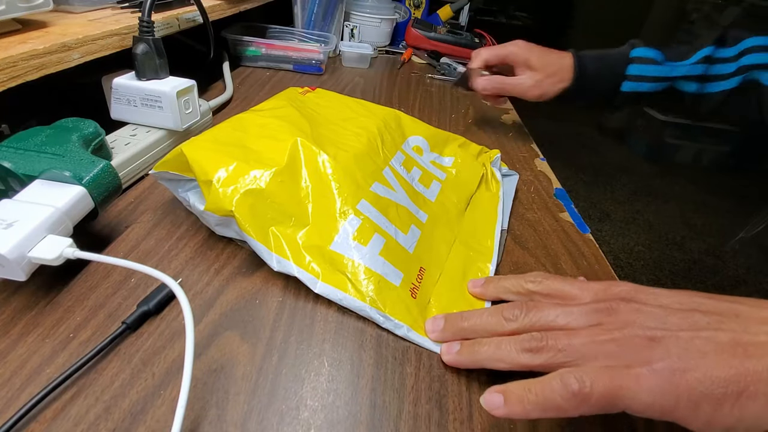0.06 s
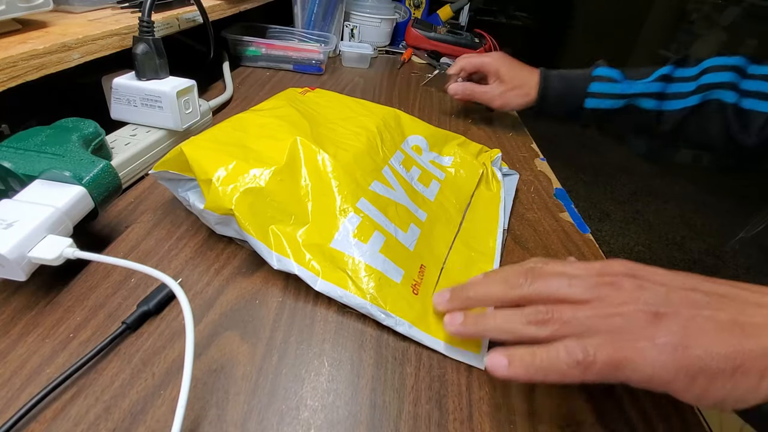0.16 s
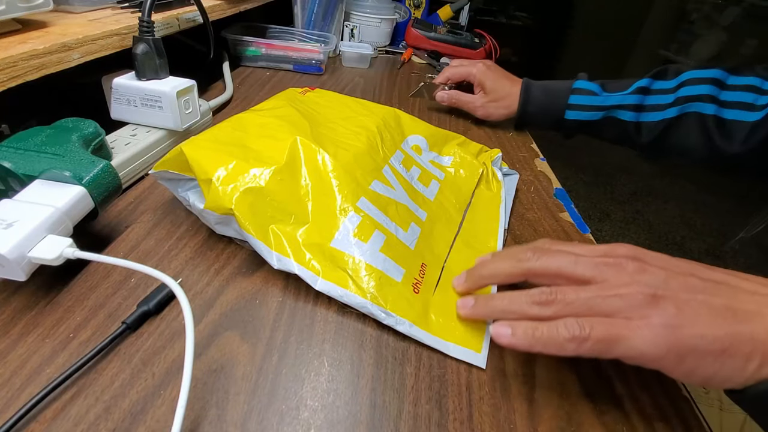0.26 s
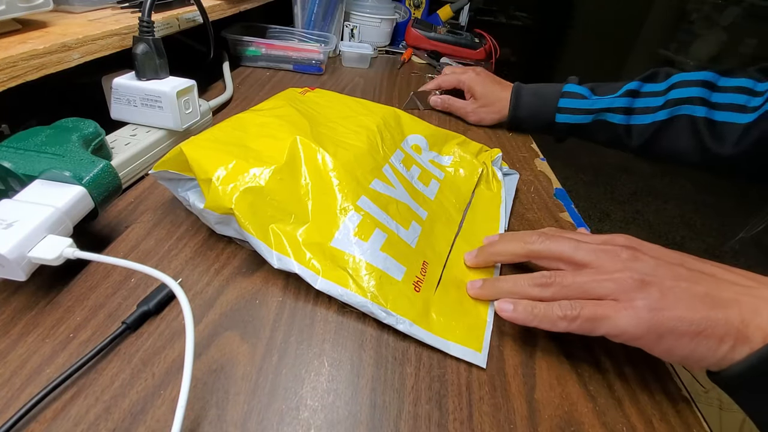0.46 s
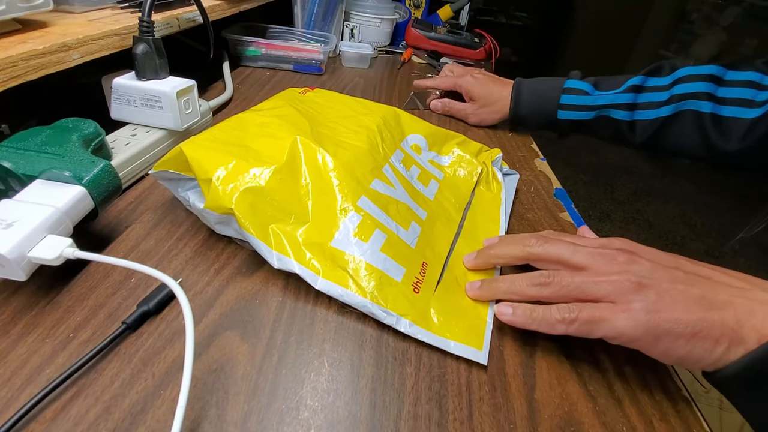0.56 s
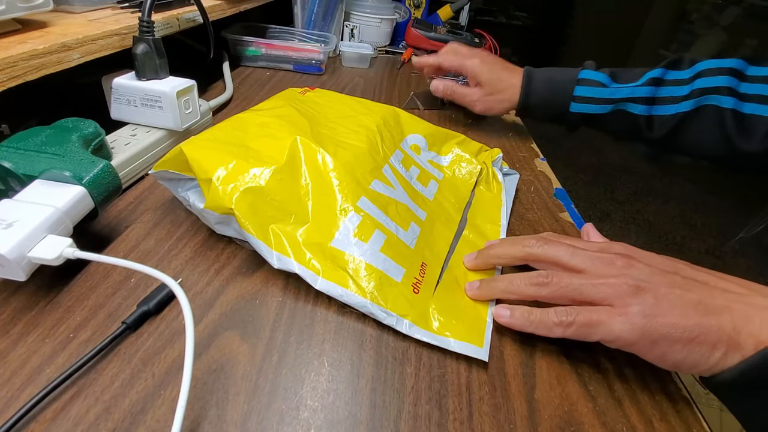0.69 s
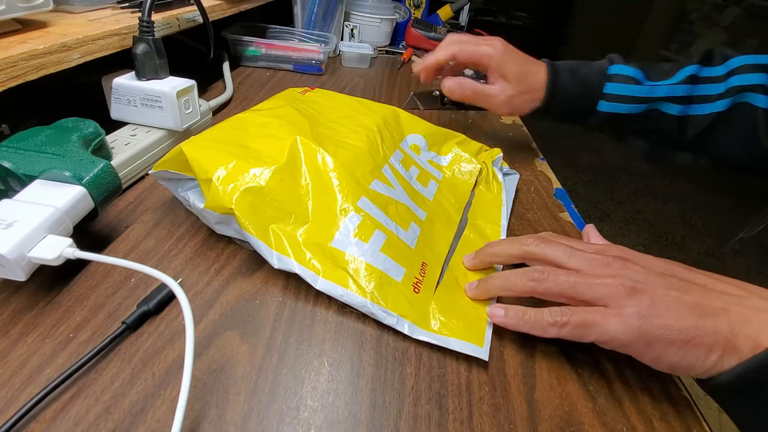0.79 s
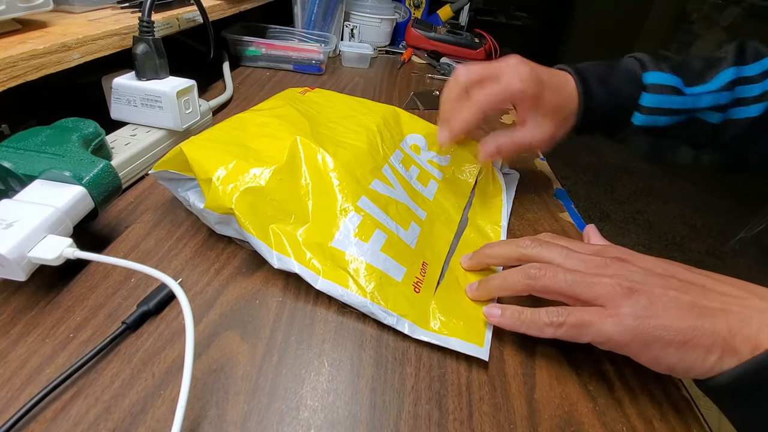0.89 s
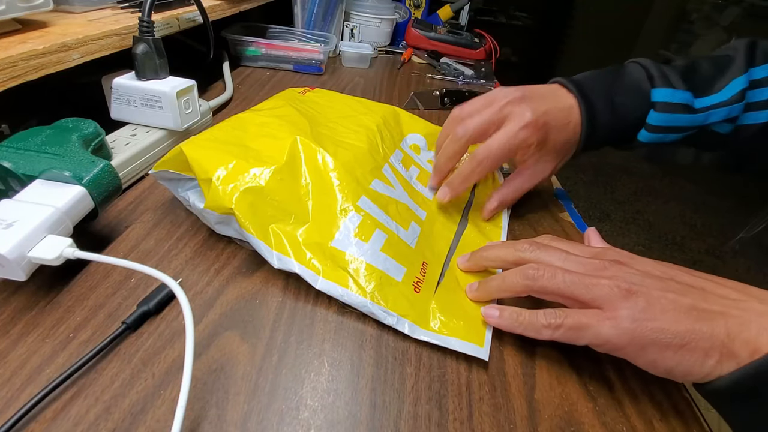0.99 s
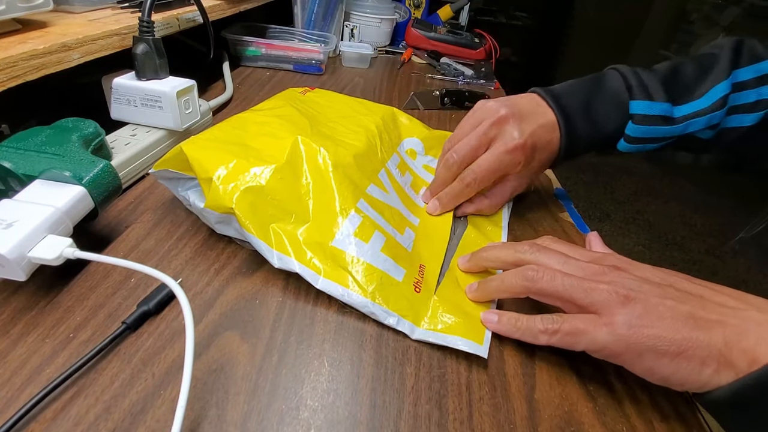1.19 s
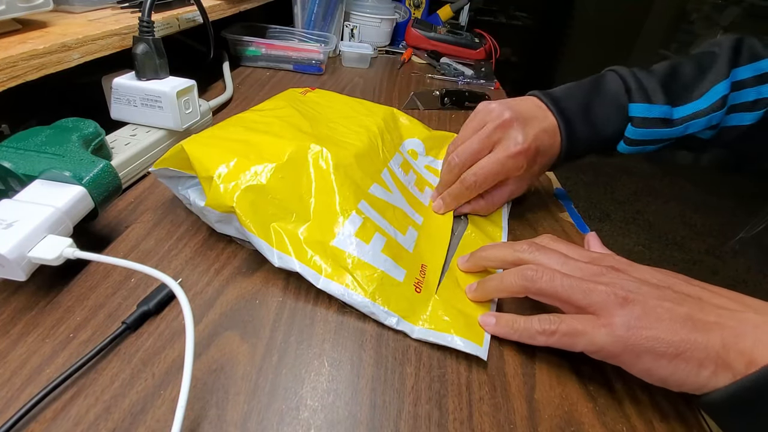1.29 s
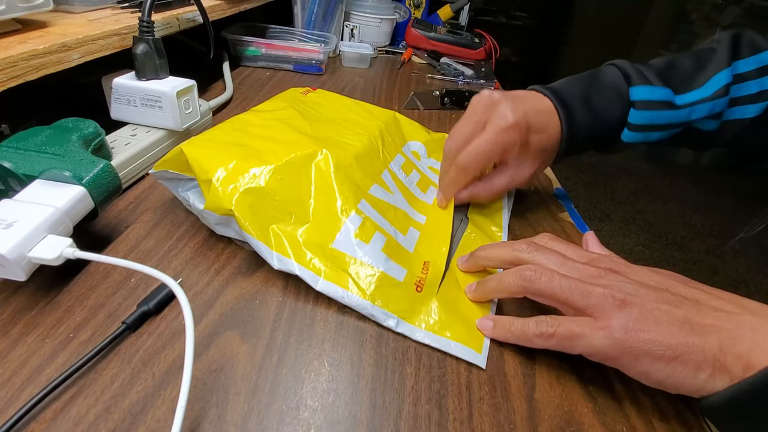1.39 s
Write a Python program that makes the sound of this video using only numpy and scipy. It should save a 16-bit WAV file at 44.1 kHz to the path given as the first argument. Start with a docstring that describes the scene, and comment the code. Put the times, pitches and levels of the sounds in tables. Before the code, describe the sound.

A small blade clunks twice onto a wooden workbench, rattles to rest, and a plastic mailer crackles

```python
"""A wooden workbench in a small room, with a plastic mailer on it, heard in stereo from close by, a little to the left.
A blade finishes its slit with a short rip and is put down: two knocks, made of contact pulses, ringing bench modes
and bursts of noise. Something light then rocks to rest in dull taps and short hollow notes. Fingers pull at the slit
and the film crinkles: snaps and crackles of resonant noise, which also makes one small metallic tool click.
Low brushing, rumble and room noise lie underneath."""
import sys
import numpy as np
from scipy import signal
from scipy.fft import irfft
from scipy.io import wavfile

SR = 44100
rng = np.random.default_rng(int(sys.argv[2]) if len(sys.argv) > 2 else 0)


def inscribe(sig):
    """Save sig as 16-bit PCM at rate SR to the path in sys.argv[1].

    A 1-D sig is mono; a 2-D sig holds one channel per row.
    Samples are clipped to [-1, 1] before scaling.
    """
    pcm = np.round(np.clip(np.atleast_2d(sig).T, -1, 1) * 32767)
    wavfile.write(sys.argv[1], SR, pcm.astype(np.int16))


N = 63945
T = np.arange(N) / SR


def from_db(db):
    """Decibels to gain."""
    return 10 ** (np.asarray(db) / 20)


def at_hz(points, hz):
    """Read a spectrum on a log-frequency axis."""
    f, v = np.transpose(points)
    return np.interp(np.log(hz + 1e-9), np.log(f), v)


def in_time(rows, s):
    """Read each column of a curve at the given times."""
    times, *columns = np.transpose(rows)
    return [np.interp(s, times, column) for column in columns]


def pan(left_db):
    """Gains of the two channels, the left one left_db above the right."""
    return from_db(np.array([[.5], [-.5]]) * left_db)


def fade(t, t60):
    """Exponential decay by 60 dB in t60 seconds."""
    return np.exp(-np.log(1000) * t / t60)


def add(out, s, sound):
    """Mix a sound in at a given time."""
    i = max(int(s * SR), 0)
    part = out[:, i:i + sound.shape[-1]]
    part += sound[..., :part.shape[-1]]


# Likeness of the two microphone channels. Each row: frequency in Hz, likeness from 0 (unrelated) to 1 (same).
CHANNEL_LIKENESS = [(60, .95), (300, .85), (700, 0.52), (1400, 0.22), (3000, .25), (7000, 0), (15000, 0)]


def noise(spectrum, size, extra_db=lambda hz: 0):
    """Stereo noise of random phases with a given spectrum, more alike in the bass; rms 1."""
    hz = np.fft.rfftfreq(size, 1 / SR)
    mid, side = np.exp(2j * np.pi * rng.random((2, len(hz))))
    alike = np.clip(at_hz(CHANNEL_LIKENESS, hz), -1, 1)
    both = np.sqrt(1 + alike) * mid + np.sqrt(1 - alike) * side * [[1], [-1]]
    gain = from_db(at_hz(spectrum, hz) + extra_db(hz))
    x = irfft(both * gain * (hz > 0), size)
    return x / np.sqrt(np.mean(x ** 2))


ROOM_T60_S, ROOM_DELAY_S = 0.25, 0.0036
EARLY_T60_S, EARLY_DB = 0.054, 17  # level relative to the room's tail


def room(x):
    """Quick reflections from the bench and shelves, then the room's short tail, as fading noise."""
    t = T[:SR // 3]
    decay = fade(t, ROOM_T60_S) + from_db(EARLY_DB) * fade(t, EARLY_T60_S)
    echo = rng.standard_normal((2, len(t))) * decay * (t > ROOM_DELAY_S)
    echo = echo / np.sqrt(np.sum(echo ** 2) / 2)
    return signal.fftconvolve(x, echo, axes=1)[:, :N]


# The hand and the bag brushing the bench. Each row: time in seconds, level in dB before panning.
BRUSH_LEVEL = [(0, -48), (.05, -58), (.11, -72), (.16, -94), (.36, -63), (.46, -51), (.545, -52.5),
               (.58, -95), (1.02, -60), (1.07, -57), (1.13, -60), (1.27, -83), (1.45, -70)]
# Colour of the brushing. Each row: frequency in Hz, relative level in dB.
BRUSH_SPECTRUM = [(25, -22.5), (55, 3), (95, 6), (160, -13.5), (350, -2.5), (800, -25.5), (2000, -43.5)]
# Faint low rumble of the shaken bench. Each row: time in seconds, level in dB before panning.
SHIVER_LEVEL = [(.2, -82), (.24, -66.5), (.55, -60), (.9, -65.5), (1.45, -60)]
# Colour of that rumble. Each row: frequency in Hz, relative level in dB.
SHIVER_SPECTRUM = [(30, -19.5), (60, 1.5), (150, -5.5), (240, -1.5), (350, -1.5), (500, -5), (800, -14),
                   (2000, -43)]
# Colour of the quiet room. Each row: frequency in Hz, relative level in dB.
QUIET_SPECTRUM = [(20, -17), (50, 8), (100, -6), (170, -14.5), (300, -26), (700, -20), (2000, -28.5),
                  (7000, -25.5), (7600, -36.5), (16000, -34.5)]
QUIET_DB = -70


def background():
    """Soft low brushing and the shaken bench, as noise with moving levels over the steady quiet of the room."""
    brush = from_db(in_time(BRUSH_LEVEL, T)[0]) * noise(BRUSH_SPECTRUM, size=N)
    shiver = from_db(in_time(SHIVER_LEVEL, T)[0]) * noise(SHIVER_SPECTRUM, size=N)
    quiet = from_db(QUIET_DB) * noise(QUIET_SPECTRUM, size=N)
    return (brush + shiver + quiet) * pan(2.5)


# Knocks on the bench, the first with a faint second contact. Each row: time in seconds, spot struck,
# contact pulse in dB, its pitch in Hz, then modes, dense ring, room tail and clatter in dB, all before panning.
KNOCKS = [(.2220, "first", -4, 1204, -27.5, -17, -22, -31.5),
          (.2640, "first", -43, 600, -41.5, -35, -42.5, -70),
          (0.4321, "second", -8, 1171, -30.5, -13.5, -23.5, -33.5)]
# The bench's modes. Each row: frequency in Hz, t60 in seconds,
# relative level in dB when struck at the first spot, the same at the second spot.
BENCH_MODES = [(58.9, 0.45, -19, -9.5), (88, 0.31, -3, -5), (117.6, 0.13, -6, 3.5), (211, 0.11, -13.5, -2),
               (268.2, 0.28, -6.5, -15), (390, 0.14, 2.5, 8), (471.4, 0.23, -2.5, -11),
               (645.2, 0.17, 2.5, -0.5), (707.6, .13, 0, 5), (851.5, 0.2, 0.5, -0.5), (979, 0.084, 6, -20),
               (1065, 0.11, 2, 7.5), (1155, 0.1, 6.5, 8), (1492, 0.057, 11, -7), (1860, 0.075, -19, -23.5),
               (2428, 0.08, -30, -10.5)]
# Colours of the dense ring, room tail and clatter. Each row: frequency in Hz, relative level in dB.
RING_SPECTRUM = [(20, -41), (45, -20), (100, 4), (300, -6.5), (700, 2.5), (1500, 3.5), (1900, 0.5),
                 (2700, -20.5), (4500, -22), (8000, -39), (16000, -40)]
TAIL_SPECTRUM = [(20, -35), (45, -11.5), (100, 2), (300, 4), (700, -1), (1400, 0), (2000, -11),
                 (2800, -17.5), (6300, -25), (8000, -32.5), (16000, -34.5)]
CLATTER_SPECTRUM = [(500, -24), (2500, 0), (5500, -0.5), (8000, -11.5), (12000, -7), (16000, -21.5)]
RING_T60_S = 0.074
TAIL_T60_S, TAIL_RISE_S = .23, 0.012
CLATTER_T60_S, CLATTER_DELAY_S = 0.059, .002
KNOCK_LEFT_DB, PULSE_LEFT_DB, RIGHT_LAG_S = 2.5, 7.5, .00003


def contact_pulse(s, hz):
    """A hard contact: one dip between two smaller humps, reaching the right channel slightly late."""
    arrival = s + np.array([[0], [RIGHT_LAG_S]])
    u = (np.pi * hz * (T - arrival)) ** 2
    return (2 * u - 1) * np.exp(-u)


def bench_modes(spot, t):
    """The bench rings as fading sines of alternating sign, balanced by the spot that is struck."""
    total = 0
    for k, (hz, t60, first_db, second_db) in enumerate(BENCH_MODES):
        db = first_db if spot == "first" else second_db
        total = total + (-1) ** k * from_db(db) * np.sin(2 * np.pi * hz * t) * fade(t, t60)
    return total


def knocks():
    """A hard contact pulse sets the bench ringing; loose things on it clatter and the room answers."""
    out, t = np.zeros((2, N)), T[:SR // 2]
    pulses = 0
    for s, spot, pulse_db, hz, modes_db, ring_db, tail_db, clatter_db in KNOCKS:
        pulses = pulses + from_db(pulse_db) * contact_pulse(s, hz)
        modes = from_db(modes_db) * bench_modes(spot, t)
        ring_onset = np.minimum(t * hz, 1)
        ring = from_db(ring_db) * noise(RING_SPECTRUM, size=len(t)) * fade(t, RING_T60_S) * ring_onset
        tail_shape = fade(t, TAIL_T60_S) * (1 - np.exp(-t / TAIL_RISE_S))
        tail = from_db(tail_db) * noise(TAIL_SPECTRUM, size=len(t)) * tail_shape
        clatter = from_db(clatter_db) * noise(CLATTER_SPECTRUM, size=len(t)) * fade(t, CLATTER_T60_S)
        add(out, s, modes + ring + tail)
        add(out, s + CLATTER_DELAY_S, clatter)
    return out * pan(KNOCK_LEFT_DB) + pulses * pan(PULSE_LEFT_DB)


# Landings of the rocking object. Each row: time in seconds, level in dB before room and panning.
LANDINGS = [(.329, -53.5), (.566, -43), (.597, -48), (.650, -44.5), (0.713, -47.5), (.7605, -44.5),
            (.820, -51.5), (0.861, -45), (.917, -50.5), (.954, -46), (1.008, -52), (1.041, -46),
            (1.083, -48.5), (1.119, -45.5), (1.161, -59), (1.195, -48), (1.236, -51.5), (1.263, -49.5),
            (1.324, -51)]
# Its hollow note. Each row: frequency in Hz, relative level in dB, t60 in seconds before choking.
HOLLOW_NOTE = [(396.2, -0.5, 0.29), (580, -30, .1), (684, -13, 0.097), (1560, -23, 0.078)]
# Colour of its dull tap. Each row: frequency in Hz, relative level in dB.
TAP_SPECTRUM = [(100, -18.5), (300, 3), (700, -8.5), (1000, -5.5), (1600, -10), (2300, -28), (6000, -41.5)]
TAP_DB, TAP_T60_S = -10, .08
HOLD_S = 0.032  # the note is choked around this time
BEND, BEND_S = 0.21, 0.0047  # starting sharpness as a fraction, and its time constant
ROCK_ROOM_DB, ROCK_LEFT_DB = -6, 1


def rocking():
    """Each landing gives a dull tap and a hollow note, its lowest part sharp at first, choked as the object tips on."""
    out, t = np.zeros((2, N)), T[:SR // 8]
    bent = t + BEND * BEND_S * (1 - np.exp(-t / BEND_S))
    note = 0
    for k, (hz, db, t60) in enumerate(HOLLOW_NOTE):
        clock = t if k else bent
        note = note - from_db(db) * np.sin(2 * np.pi * hz * clock) * fade(t, t60)
    choked = note / (1 + (t / HOLD_S) ** 10)
    for s, db in LANDINGS:
        tap = from_db(TAP_DB) * noise(TAP_SPECTRUM, size=len(t)) * fade(t, TAP_T60_S)
        add(out, s, from_db(db) * (tap + choked))
    return (out + from_db(ROCK_ROOM_DB) * room(out)) * pan(ROCK_LEFT_DB)


# Colour shared by the film and the tool click. Each row: frequency in Hz, relative level in dB.
FILM_SPECTRUM = [(60, -18), (300, -10), (800, 1.5), (2000, -2), (4000, -2.5), (6500, -6.5), (8000, -13),
                 (12000, -15), (16000, -23.5)]
PEAK_DB, PEAK_WIDTH_OCT, LOW_CUT_DB_PER_OCT = 9.5, 0.12, 1.5
TREBLE_HZ = 6090  # the treble tilt pivots here


def snap(hz, treble_db, t60):
    """A very short crack of noise with one resonance, weaker below it: a buckling film facet or part of a tool click."""
    def colour(f):
        """Resonant peak, treble tilt, and a low cut starting an octave below the peak, in dB."""
        octaves = np.log2(f / hz + 1e-9)
        peak = PEAK_DB / (1 + (octaves / PEAK_WIDTH_OCT) ** 2)
        tilt = treble_db * (f ** 2 - TREBLE_HZ ** 2) / (f ** 2 + TREBLE_HZ ** 2)
        return peak + tilt + LOW_CUT_DB_PER_OCT * np.minimum(octaves + 1, 0)
    crack = noise(FILM_SPECTRUM, size=1024, extra_db=colour)
    return crack * fade(T[:crack.shape[1]], t60)


# Single snaps of the film, and at 0.90 s one small metallic tool click made of two parts.
# Each row: time in seconds, level in dB before room and panning, pitch in Hz,
# treble tilt in dB (up above the pivot, down below it), t60 in seconds.
SNAPS_AND_CLICK = [(.0074, -34.5, 1420, 12.5, 0.022), (0.0125, -27.5, 1610, -3, 0.024),
                   (.0170, -32, 1156, -17, 0.015), (0.0933, -49, 1630, -1.5, 0.026),
                   (.137, -56.5, 2260, -1.5, 0.023), (0.1962, -47, 1800, -11, 0.019),
                   (0.5212, -42, 4500, -12.5, 0.021), (0.5458, -44, 3220, -17, 0.027),
                   (.563, -46.5, 2140, -8, 0.027), (0.6102, -49.5, 5400, -2, 0.02),
                   (0.6895, -54, 3500, -0.5, 0.018), (.700, -57, 2626, 3.5, .03),
                   (.9008, -40.5, 3640, 2, 0.018), (0.9016, -47.5, 2140, 3, 0.029),
                   (1.0107, -56, 5800, 5.5, 0.02), (1.061, -42, 5660, -10, 0.021),
                   (1.067, -38.5, 1000, 16, 0.014), (1.1618, -42.5, 1157, -17, 0.036),
                   (1.2023, -41, 2600, -4, .03), (1.2305, -36, 4750, 10, 0.0087),
                   (1.2308, -38, 2710, 1, 0.013), (1.241, -52, 2600, -10, .016),
                   (1.2867, -32, 3880, -1.5, 0.023), (1.306, -36.5, 1540, -18, .014),
                   (1.322, -42, 3130, -17, 0.019), (1.3778, -38.5, 3700, -3.5, 0.03),
                   (1.3801, -39.5, 1720, -6, 0.017), (1.389, -37, 3940, 4, 0.01),
                   (1.403, -37.5, 4570, 4, 0.011), (1.411, -46, 4500, -7, 0.012),
                   (1.426, -52, 1500, -3, 0.0078), (1.443, -35.5, 2050, -1.5, 0.011)]
# How hard the film is worked. Each row: time in seconds, base level of crackles and rustle in dB,
# treble tilt of the crackles in dB.
HANDLING = [(0, -34.5, -1), (.014, -36.5, 4), (.028, -78, -11), (.08, -74, 10), (.16, -71, 1),
            (.22, -58, 1), (.30, -102, -1.5), (.42, -91.5, -4), (.56, -61, -20), (.64, -75, -18),
            (.8, -87, 21), (1.035, -75.5, 13.5), (1.05, -52, 13), (1.10, -59, -6), (1.15, -57.5, 9),
            (1.205, -49.5, -1.5), (1.265, -59.5, 3), (1.31, -48, 0.5), (1.352, -53.5, -8),
            (1.40, -46.5, -7), (1.45, -46, -13)]
RUSTLE_DB, CRACKLE_DB = -6, -0.5  # relative to the handling
CRACKLES_PER_S, CRACKLE_SPREAD_DB, CRACKLE_T60_S = 380, 4, 0.014
CRACKLE_LOW_HZ, CRACKLE_HIGH_HZ = 746, 7100
FILM_ROOM_DB, FILM_LEFT_DB = -5.5, 3


def crackles(out):
    """Small facets buckle at scattered times and pitches, mostly weak and a few strong."""
    draws = rng.random((int(CRACKLES_PER_S * N / SR), 3))
    for k, (when, size, facet) in enumerate(draws):
        s = (k + 2 * when - 1) / CRACKLES_PER_S
        handling_db, treble_db = in_time(HANDLING, s)
        hz = CRACKLE_LOW_HZ * (CRACKLE_HIGH_HZ / CRACKLE_LOW_HZ) ** facet
        strength_db = CRACKLE_SPREAD_DB * (-np.log(size + 0.03) - 0.5)
        db = handling_db + CRACKLE_DB + strength_db
        add(out, s, from_db(db) * snap(hz, treble_db, CRACKLE_T60_S))


def film_and_click():
    """Single film snaps and one tool click, with small crackles and a soft rustle that follow the handling."""
    out = from_db(in_time(HANDLING, T)[0] + RUSTLE_DB) * noise(FILM_SPECTRUM, size=N)
    for s, db, hz, treble_db, t60 in SNAPS_AND_CLICK:
        add(out, s, from_db(db) * snap(hz, treble_db, t60))
    crackles(out)
    return (out + from_db(FILM_ROOM_DB) * room(out)) * pan(FILM_LEFT_DB)


def scene():
    """Everything at the bench, heard from close by."""
    return background() + knocks() + rocking() + film_and_click()


CUTOFF_HZ = 16000


def record(dry):
    """At the microphone, peaks stop at full scale and a steep low-pass cuts the top."""
    low_pass = signal.ellip(10, .2, 80, CUTOFF_HZ, fs=SR, output="sos")
    return signal.sosfilt(low_pass, np.clip(dry, -1, 1))


dry = scene()
out = record(dry)
inscribe(out)
```